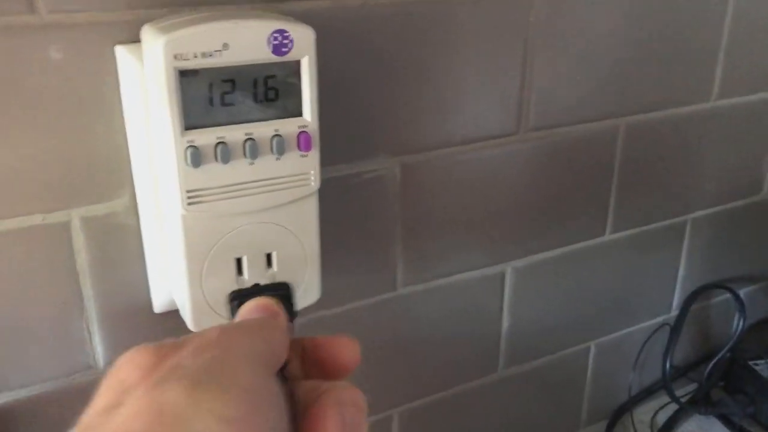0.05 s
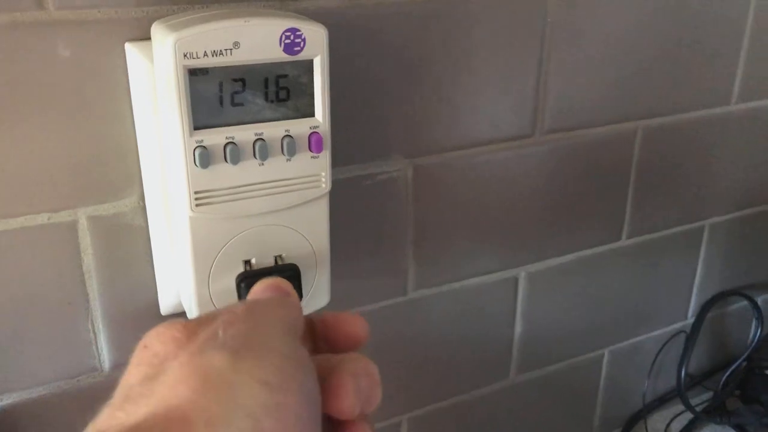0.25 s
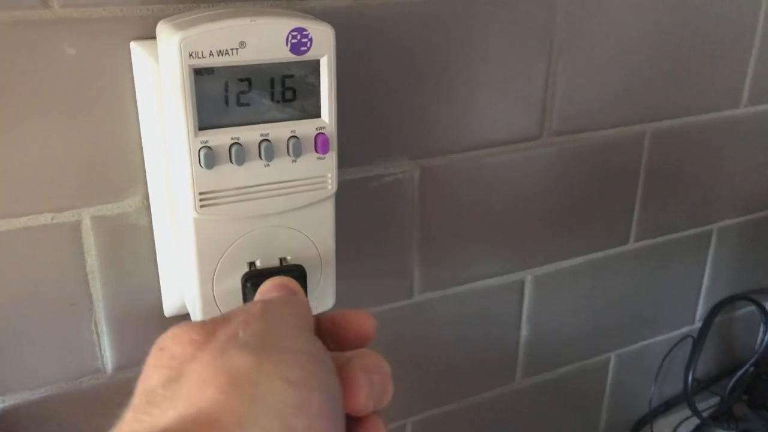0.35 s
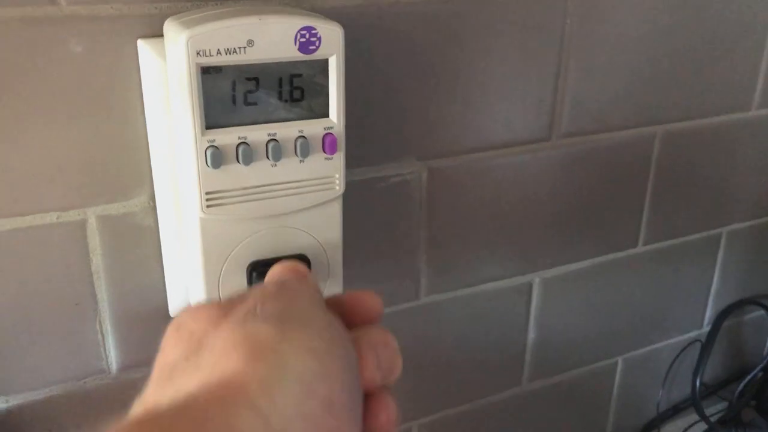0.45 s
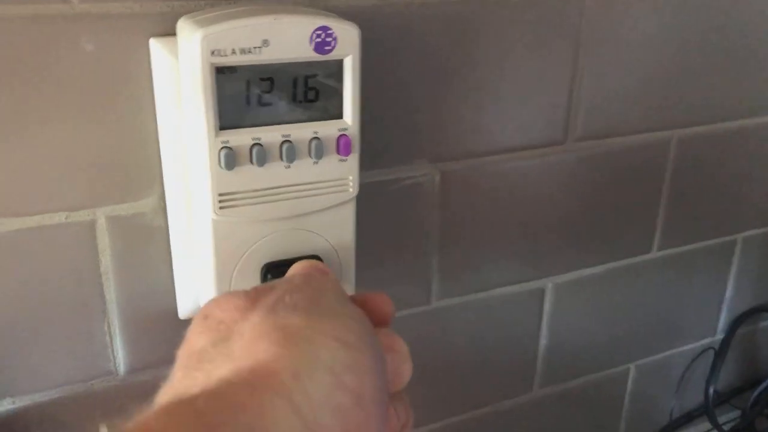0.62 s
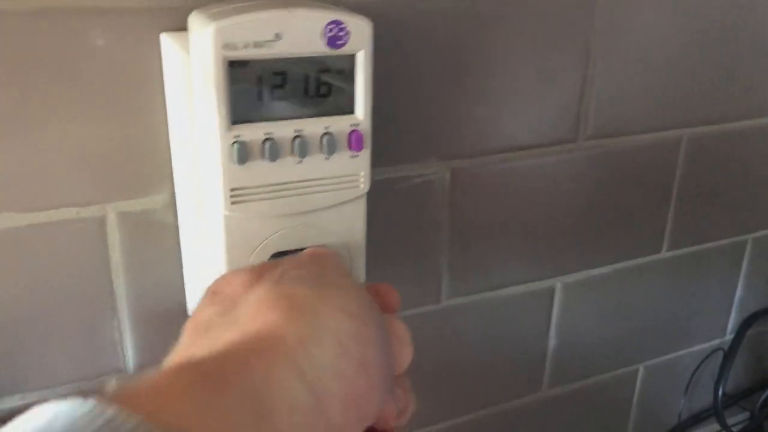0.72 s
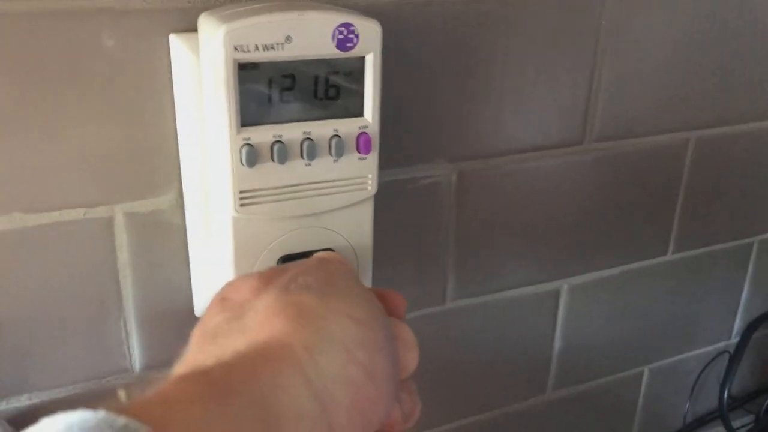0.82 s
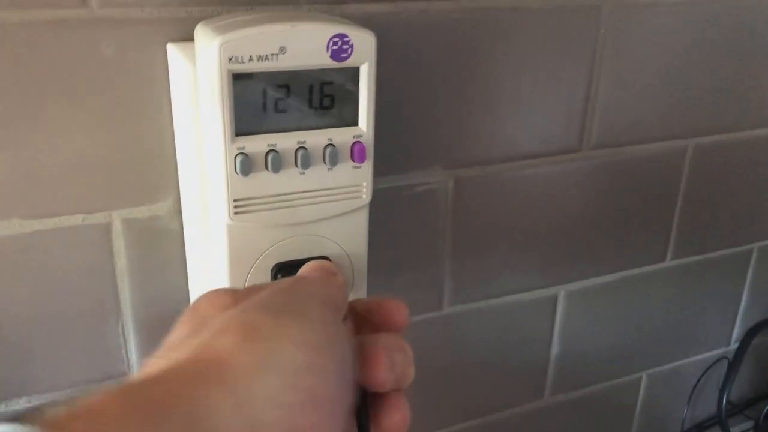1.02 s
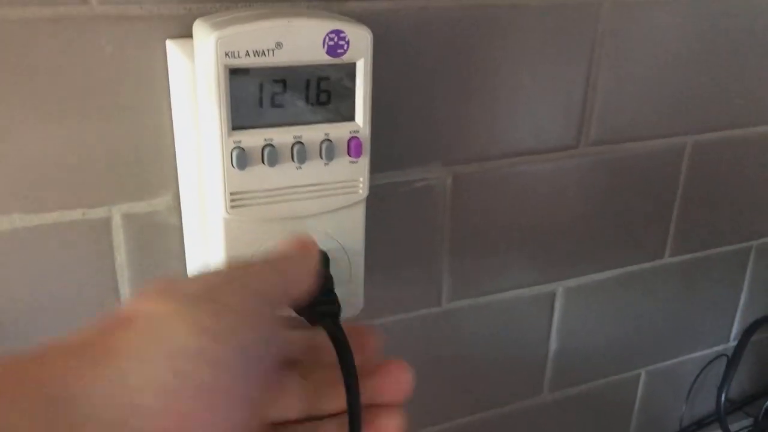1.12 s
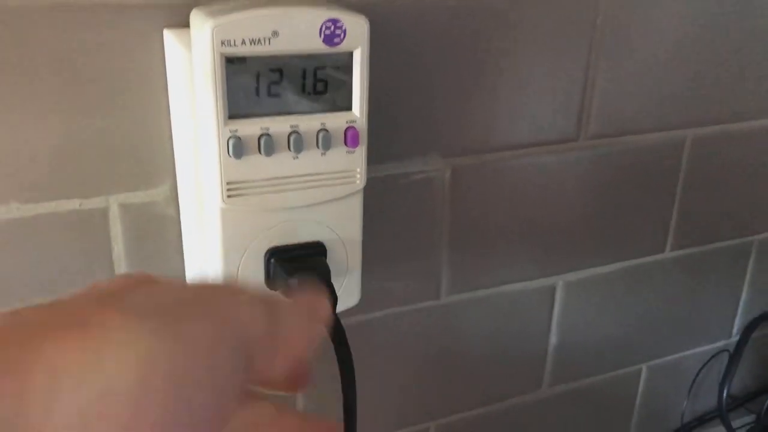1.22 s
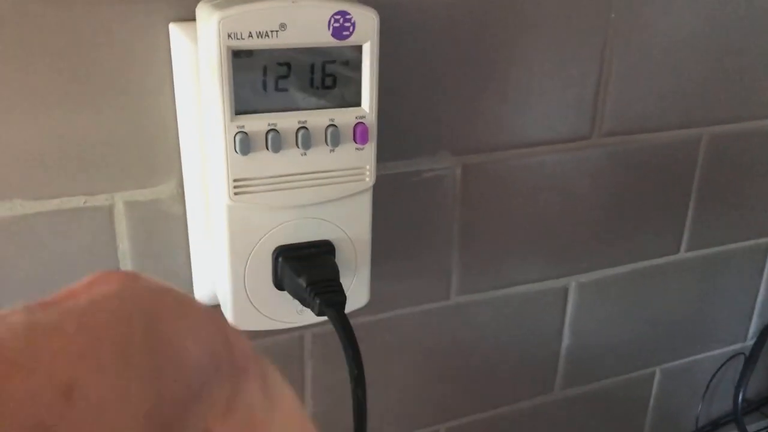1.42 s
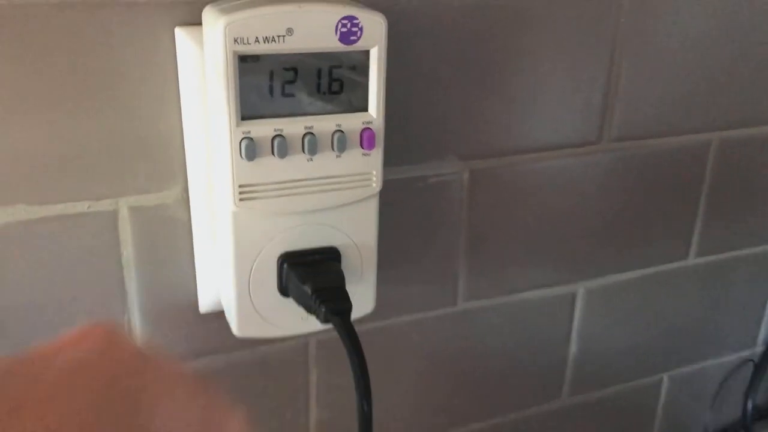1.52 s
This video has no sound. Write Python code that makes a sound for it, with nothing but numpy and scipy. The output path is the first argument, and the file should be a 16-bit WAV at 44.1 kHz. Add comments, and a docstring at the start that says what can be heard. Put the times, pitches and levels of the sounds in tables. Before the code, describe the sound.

A plug clacks into a socket with a short scrape and small knocks.

```python
"""A sharp plastic clack sounds close by in a quiet room: a mains plug meets a plug-in meter on a wall.
The prongs knock on its face, scrape into the spring contacts and seat with a clunk. The meter rocks
in its outlet with low thumps and small ticks as the hand lets go. Each knock is a burst of noise plus
brief ringing tones, and each scrape is a rush of tiny clicks. A short room tail follows each sound."""
import sys
import numpy as np
from scipy import signal
from scipy.fft import rfft, irfft
from scipy.io import wavfile

SR = 44100
rng = np.random.default_rng(int(sys.argv[2]) if len(sys.argv) > 2 else 0)


def master_out(mix):
    """Clip the mix to full scale and print it as 16-bit PCM to the path in sys.argv[1]."""
    frames = np.transpose(np.atleast_2d(mix))
    ceiling = np.clip(frames, -1, 1)
    pcm = np.round(ceiling * 32767).astype(np.int16)
    wavfile.write(sys.argv[1], SR, pcm)


N = 68355
T = np.arange(N) / SR

# Hard knocks of prongs, plug and casing; the spot that is struck favours one tone, its ping:
# (time [s], six relative band levels from low to high [dB], ping pitch [Hz], ping level [dB])
KNOCKS = [(0.2257, -30.5, -43, -32.5, -40, -48.5, -56.5, 2908, -35.5),
          (0.2404, -42.5, -39.5, -35.5, -36, -50.5, -73, 4300, -46),
          (0.2505, -43, -44, -51, -46.5, -58, -70, 1363, -49.5),
          (0.2752, -44, -54.5, -45.5, -71, -60, -74, 2180, -57),
          (0.3205, -41.5, -46, -38, -45, -50.5, -59, 3086, -46),
          (0.3435, -43.5, -55.5, -60, -67, -67, -79, 595, -56),
          (0.4210, -79, -66, -62, -67, -63, -84, 5200, -63),
          (0.4612, -69, -67, -49, -52, -54, -57.5, 4000, -48.5),
          (0.4720, -50, -60, -51.5, -91, -70, -71, 829.5, -46.5),
          (0.5182, -66, -55.5, -51.5, -63, -52.5, -64, 1766, -48.5),
          (0.5305, -53.5, -55.5, -54.5, -71, -58.5, -72, 4110, -53.5),
          (0.571, -52, -64, -69, -77, -68, -71, 955, -60),
          (0.6600, -65.5, -76.5, -90, -85, -86, -90, 599, -66.5),
          (0.7745, -44, -47.5, -51, -56.5, -56, -68, 511, -42.5),
          (0.876, -51.5, -75, -67, -88, -88, -88, 965, -60),
          (0.8873, -53, -53, -44.5, -61, -65.5, -72, 5570, -57.5),
          (0.906, -53.5, -69, -70, -89, -88, -90, 514, -50.5),
          (1.011, -73, -74, -80, -74.5, -76, -82, 1860, -87),
          (1.0260, -66, -71, -78, -75, -74, -85, 1981, -71),
          (1.1423, -58.5, -61.5, -62.5, -66, -60.5, -68, 2860, -62.5),
          (1.1564, -55.5, -59, -57, -66, -74, -82, 1170, -54),
          (1.3404, -83, -88, -89, -81, -71, -64.5, 15400, -70),
          (1.3897, -71, -79, -70.5, -65, -61.5, -61, 4020, -67),
          (1.4737, -59, -70.5, -73, -81, -73.5, -75, 793, -68)]


def amp(db):
    """Turn decibels into a gain."""
    return 10 ** (np.asarray(db) / 20)


def unit(x):
    """Scale a sound to an average (rms) level of 1."""
    return x / np.sqrt(np.mean(x ** 2))


def fade(t60):
    """A smooth decay that falls by 60 dB in t60 seconds."""
    return np.exp(-np.log(1000) * T / t60)


def late(x, seconds):
    """Start a sound after a delay, in a track as long as the scene."""
    return np.pad(x, (int(seconds * SR), N))[:N]


def band_noise(low_hz, high_hz):
    """Noise between two frequencies, at level 1."""
    band = signal.butter(5, [low_hz, high_hz], btype="band", fs=SR, output="sos")
    return unit(signal.sosfilt(band, rng.standard_normal(N)))


def colour(x, points):
    """Shape a sound's bass and treble along (Hz, dB) points, then scale it to level 1."""
    hz, db = np.array(points).T
    freqs = np.maximum(np.arange(N + 1) * SR / (2 * N), 1)
    gain = amp(np.interp(np.log(freqs), np.log(hz), db))
    bass_cut = np.minimum(freqs / hz[0], 1) ** 2
    return unit(irfft(rfft(x, 2 * N) * gain * bass_cut)[:N])


def room(x, tail_db, t60, build_s=0.004):
    """Reflections from the room blur into a tail that builds quickly and dies away."""
    tail = rng.standard_normal(N) * fade(t60) * (1 - np.exp(-T / build_s))
    return x + amp(tail_db) * signal.fftconvolve(x, tail / np.linalg.norm(tail))[:N]


def room_rumble():
    """The faint, steady rumble and hiss of the room."""
    # Tone of the background: (frequency [Hz], relative level [dB])
    rumble_colour = [(28, -16), (42, -2), (75, 1.5), (150, -5.5), (240, -3), (340, -10), (520, -17),
                     (800, -20), (1500, -26), (2200, -30), (6500, -34), (16000, -39.5)]
    return amp(-64) * colour(rng.standard_normal(N), rumble_colour)


def scrapes(grains_per_s=1700, spread_db=1):
    """Sliding prongs stick and slip in tiny clicks that grow with the push and fade as they catch."""
    # Slides on plastic and between the spring contacts:
    # (start [s], peak time [s], fade time [s], level [dB], tilt above 3 kHz [dB per octave])
    slides = [(0.282, 0.321, 0.0072, -54, -10), (0.43, 0.443, 0.043, -56.5, -2.5),
              (0.477, 0.524, 0.019, -51, -4.5), (0.667, 0.702, 0.045, -70.5, -7),
              (0.728, 0.766, 0.01, -51.5, 0), (0.917, 1.018, 0.09, -69, -24),
              (1.06, 1.16, 0.023, -66, -3.5)]
    # Tone of a scrape: (frequency [Hz], relative level [dB])
    scrape_colour = [(250, 5.5), (480, 6), (1100, -9), (1900, -7.5), (2550, 2.5), (3400, -6.5),
                     (4150, -0.5), (5500, -2), (7300, -2), (9000, -10.5), (11000, -11), (16000, -17)]
    out = np.zeros(N)
    for start, peak, release, db, tilt in slides:
        slips = rng.random(N) < grains_per_s / SR
        grains = slips * rng.choice([-1, 1], N) * amp(spread_db * rng.standard_normal(N))
        tilted = [(hz, level + tilt * max(np.log2(hz / 3000), 0)) for hz, level in scrape_colour]
        push = np.clip((T - start) / (peak - start), 0, 1) ** 1.4
        catch = np.exp(-np.maximum(T - peak, 0) / release)
        out += amp(db) * push * catch * colour(grains, tilted)
    return room(out, tail_db=-12, t60=0.23)


def swing(start, hz, db, swell_s, t60, release_s=0.0046):
    """One low tone swells under a soft push, then dies away as the hand eases off."""
    rise = np.sin(np.pi / 2 * np.minimum(T / swell_s, 1))
    after = np.maximum(T - swell_s, 0)
    decay = np.exp(-np.log(1000) * after ** 2 / (t60 * (after + release_s)))
    return late(np.sqrt(2) * amp(db) * rise * decay * np.sin(2 * np.pi * hz * T), start)


def thumps(echo_s=0.034, echo_db=-13.5, boom_hz=234.2, boom_db=-16):
    """The meter rocks on its own prongs; the far wall echoes it and the room booms at one low pitch."""
    # Swings of the meter in its outlet: (time [s], pitch [Hz], level [dB], swell [s], t60 [s])
    swings = [(0.2289, 229, -32, 0.0052, 0.13), (0.2420, 233.6, -27.5, 0.019, 0.02),
              (0.3238, 228, -41.5, 0.0076, 0.03), (0.3520, 228, -42.5, 0.0055, 0.048),
              (0.4222, 236, -44, 0.004, 0.086), (0.4750, 223, -37.5, .011, 0.058),
              (0.5560, 230, -49, 0.0033, 0.069), (0.581, 229, -51, 0.0052, 0.063),
              (0.749, 205.8, -47.5, 0.023, 0.069), (0.777, 256.8, -33.5, 0.0027, 0.043),
              (0.791, 77, -55.5, 0.028, 0.11), (0.847, 256, -50, 0.01, 0.056),
              (0.8810, 262, -46, 0.002, 0.064), (1.024, 254, -54, 0.0036, 0.045),
              (1.1470, 221.5, -46.5, 0.019, 0.022), (1.477, 231, -46.5, 0.011, 0.068)]
    rocking = sum(swing(*row) for row in swings)
    room_ring = fade(t60=0.39) * np.cos(2 * np.pi * boom_hz * T)
    boom = unit(signal.fftconvolve(rocking, room_ring)[:N]) * np.std(rocking)
    return rocking + late(amp(echo_db) * rocking + amp(boom_db) * boom, echo_s)


def pings(tones=5, pitch_spread=0.03, rise_cycles=0.9):
    """Each struck spot rings briefly with a tight cluster of tones around its favoured pitch."""
    out = np.zeros(N)
    size = N // 12
    t = T[:size]
    for start, *_, hz, db in KNOCKS:
        t60 = 0.058 * (hz / 1000) ** -0.14  # higher tones die sooner
        shape = (1 - np.exp(-t * hz / rise_cycles)) * fade(t60)[:size]
        shape /= shape.max()
        cluster_hz = hz * (1 + pitch_spread * rng.standard_normal((tones, 1)))
        phases = rng.random((tones, 1))
        ring = shape * np.sin(2 * np.pi * (cluster_hz * t + phases)).sum(axis=0)
        ring *= np.linalg.norm(shape) / np.linalg.norm(ring)
        out += late(amp(db) * ring, start)
    return room(out, tail_db=-14.5, t60=0.17)


def clacks(crack_db=-1.5, snap_db=-8.5, longest_ring_s=0.12):
    """Each knock shakes the plastic at so many pitches that it cracks like noise; the casing rings on."""
    # The six bands of a knock:
    # (low edge [Hz], high edge [Hz], rise [s], t60 [s], room tail level [dB], room t60 [s])
    bands = [(309, 842, 0.0039, 0.058, -12, 0.31), (1060, 2250, 0.0017, 0.069, -15, 0.63),
             (2293, 3524, 0.00014, 0.055, -19.5, 0.6), (3540, 5320, 0.0015, 0.056, -16.5, 0.43),
             (5300, 10200, 0.00025, 0.046, -19.5, 0.37), (10800, 14900, 0.00025, 0.046, -15, 0.15)]
    # Tones of the casing and prongs; only those inside a band sound:
    # (pitch [Hz], level relative to its band [dB], t60 before the longest_ring_s limit [s])
    casing_tones = [(447, -6.5, 0.035), (582, -6.5, 0.087), (852, -9, 0.14), (1241, -13, 0.12),
                    (1376, -16, 0.22), (1787, 0.5, 0.033), (1995, -5.5, 0.063), (2472, -7.5, 0.071),
                    (2851, -12, 0.068), (3480, -18, 0.06), (3542, -11, 0.044), (4070, -1.5, 0.055),
                    (4640, -12, 0.08), (5100, -35, 0.054)]
    out = np.zeros(N)
    size = N // 6
    t = T[:size]
    snap = amp(snap_db) * fade(t60=0.015)  # makes the first instant stand out
    for k, (low, high, rise, t60, tail_db, room_t60) in enumerate(bands):
        attack = 1 - np.exp(-(t / rise) ** 2)
        shape = attack * (fade(t60) + snap)[:size]
        shape /= shape.max()
        rings = [(hz, amp(db) * attack * fade(min(ring_s, longest_ring_s))[:size])
                 for hz, db, ring_s in casing_tones if low <= hz < high]
        noise = band_noise(low, high)
        band = np.zeros(N)
        for start, *levels, _, _ in KNOCKS:
            crack = np.roll(noise, rng.integers(N))[:size] * shape
            hit = amp(crack_db) * crack * np.linalg.norm(shape) / np.linalg.norm(crack)
            for (hz, ring_shape), phase in zip(rings, rng.random(len(casing_tones))):
                hit += np.sqrt(2) * ring_shape * np.sin(2 * np.pi * (hz * t + phase))
            band += late(amp(levels[k]) * hit, start)
        out += room(band, tail_db, room_t60)
    return out


def scene():
    """The plug and the meter over the room's faint rumble, in one channel."""
    return (room_rumble() + clacks() + pings() + thumps() + scrapes())[None]


def record(dry, top_hz=16100):
    """Cut away the very highest treble."""
    low_pass = signal.ellip(10, 0.2, 70, top_hz, fs=SR, output="sos")
    return signal.sosfilt(low_pass, dry)


dry = scene()
out = record(dry)
master_out(out)
```